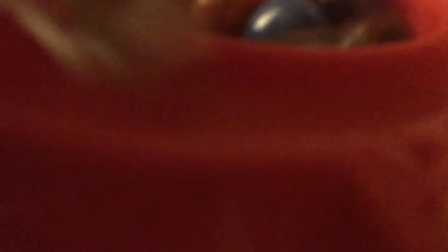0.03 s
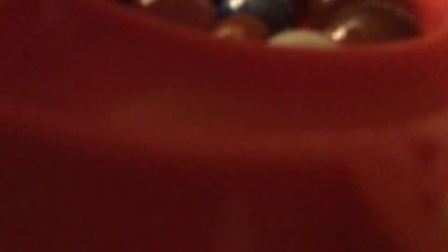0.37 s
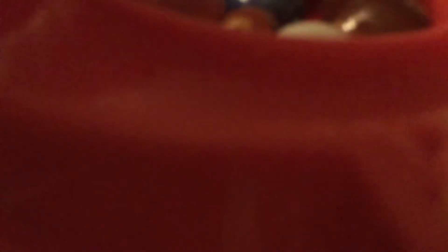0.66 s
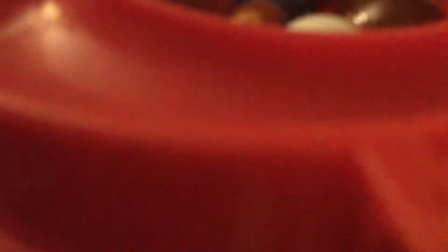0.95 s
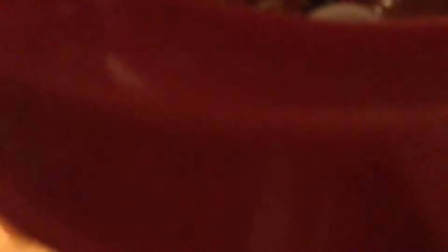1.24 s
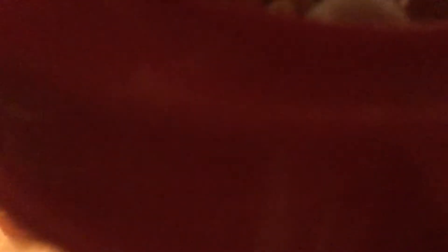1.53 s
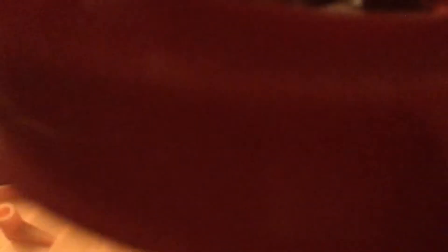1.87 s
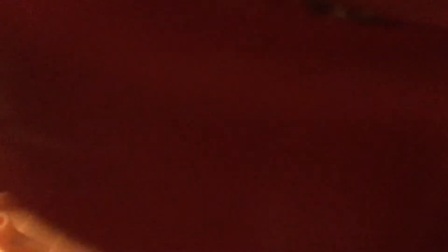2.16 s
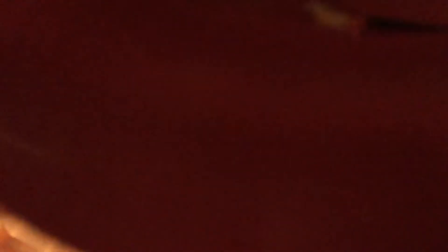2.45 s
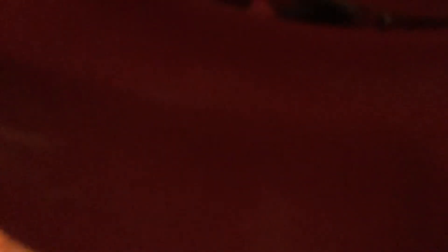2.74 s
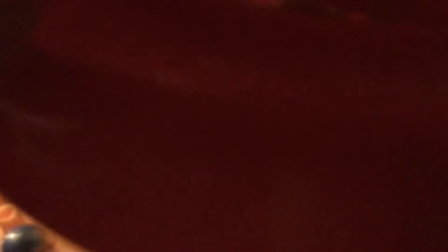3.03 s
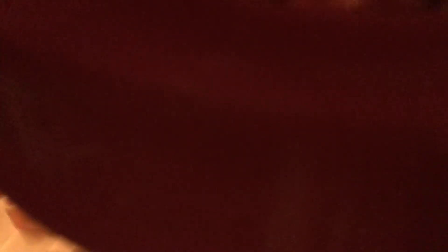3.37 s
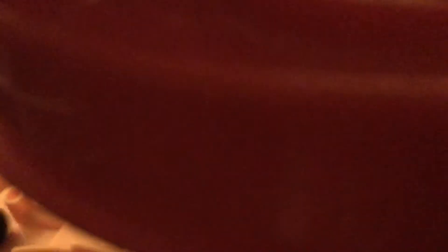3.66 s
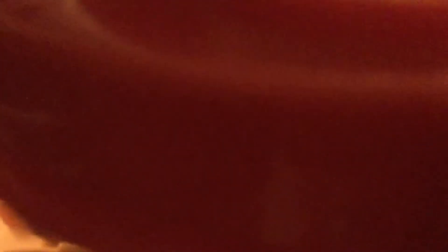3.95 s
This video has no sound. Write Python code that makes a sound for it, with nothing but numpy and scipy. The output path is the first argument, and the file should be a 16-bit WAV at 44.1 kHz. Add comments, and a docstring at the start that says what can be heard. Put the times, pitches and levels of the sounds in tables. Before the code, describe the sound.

Glass marbles stirred in a plastic bowl, sparse clicks building to a busy clatter.

```python
"""In a small room, close by, glass marbles are stirred in a plastic bowl: clacks thicken into a rattle.
Each impact excites three parts in its own shares: the bowl rings, its wall cracks, glass ticks on glass.
Rolling marbles keep the bowl ringing, lone ones clink, and square hits sound one hollow note.
Heavy blows send bending waves through the surface beneath, heard as thuds falling in pitch,
and stick-slip friction draws a few small squeaks from the plastic."""
import sys
import numpy as np
from scipy import signal
from scipy.fft import rfft, irfft
from scipy.io import wavfile
from scipy.ndimage import uniform_filter1d

SR = 44100
rng = np.random.default_rng(int(sys.argv[2]) if len(sys.argv) > 2 else 0)


def waveform_to_disk(signal):
    """Save audio, clipped to [-1, 1], as 16-bit WAV at the path in sys.argv[1]."""
    frames = np.transpose(np.atleast_2d(signal))
    scaled = np.clip(frames, -1, 1) * 32767
    samples = np.round(scaled).astype(np.int16)
    wavfile.write(sys.argv[1], SR, samples)


N = 176400


def amp(db):
    """The decibel scale: 20 dB is a tenfold amplitude."""
    return 10 ** (np.asarray(db) / 20)


def curve_at(points, hz):
    """Interpolation of a table on a logarithmic frequency axis."""
    frequency, value = np.transpose(points)
    return np.interp(np.log(hz + 1), np.log(frequency + 1), value)


def add(mix, start_s, sound):
    """Superposition: a sound adds to the mix from start_s on."""
    span = mix[max(round(start_s * SR), 0):][:len(sound)]
    span += sound[:len(span)]


def minimum_phase(colour, size=2048):
    """Minimum phase: the most compact causal impulse response with a given colour."""
    log_gain = np.log(amp(curve_at(colour, abs(np.fft.fftfreq(size, 1 / SR)))))
    return np.fft.ifft(np.exp(np.conj(signal.hilbert(log_gain)))).real[:size // 2]


def unit_attack(x):
    """Normalisation: each row gets unit RMS over its first 5 ms."""
    return x / np.sqrt(np.mean(x[:, :220] ** 2, axis=1, keepdims=True) + 1e-20)


# spectrum of the room's background noise: frequency_hz, density_db
ROOM_TONE_SPECTRUM = [(20, -15), (60, -8.5), (140, 5.5), (260, -8), (750, -2), (1400, -17), (4000, -19.5),
                      (9000, -41), (15000, -59)]

def room_tone(level_db=-47):
    """Stationary noise: the faint, steady background of the room."""
    gain = amp(curve_at(ROOM_TONE_SPECTRUM, np.fft.rfftfreq(N, 1 / SR)))
    air = irfft(rfft(rng.standard_normal(N)) * gain, N)
    return amp(level_db) * air / air.std()


# modes of the bowl, its wall and the glass: pitch_hz, level_db, t60_s
BOWL_MODES = [(800, -17.5, 0.05), (1113, -6, 0.069), (1311, -0.5, 0.034), (1437, 0.5, 0.059),
              (1648, -5.5, 0.042), (1900, -1.5, 0.0094), (2340, 4, 0.013)]
WALL_MODES = [(2554, -2.5, 0.094), (3235, -3, 0.083), (3645, -5, 0.048), (3960, 7, 0.019),
              (4595, 3.5, 0.038), (5360, 5, 0.035)]
GLASS_MODES = [(6910, 14.5, 0.014), (7630, 9.5, 0.0068), (8410, 6, 0.018), (8700, -20, 0.014),
               (9400, -14, .03), (10500, -7, 0.028)]
# spectrum of the contact crack in each part: frequency_hz, gain_db
BOWL_COLOUR = [(40, -22), (200, -10), (650, -17), (1000, -8), (1450, 1.5), (2300, -1.5), (3300, -20.5),
               (8000, -58)]
WALL_COLOUR = [(700, -61), (1800, -27.5), (2600, 1), (4800, -3.5), (6000, -8), (8000, -17), (16000, -55)]
GLASS_COLOUR = [(1500, -28), (4500, -13), (6300, 1.5), (8000, -4), (9300, 4.5), (10500, -11), (12500, -15),
                (14000, -23), (15500, -47)]
# one row each for bowl, wall and glass: level_db, ring_over_crack_db, crack_rise_s, crack_decay_s
IMPACT_PARTS = [(-3, -3.5, 0.00026, 0.0028), (-2.5, -5, 0.00047, 0.0014), (-3, -3, 0.00015, 0.0011)]

def impacts(part, count, size=2600, pitch_spread=0.031, size_spread=0.06):
    """Impact excitation of one part: a crack, and damped modes weighted by the random spot struck."""
    modes = (BOWL_MODES, WALL_MODES, GLASS_MODES)[part]
    colour = (BOWL_COLOUR, WALL_COLOUR, GLASS_COLOUR)[part]
    level_db, ring_db, rise_s, decay_s = IMPACT_PARTS[part]
    t = np.arange(size) / SR
    contact = rng.standard_normal((count, size)) * (1 - np.exp(-t / rise_s)) * np.exp(-t / decay_s)
    shifts = np.exp(size_spread * np.linspace(-2, 2, 9))  # marble size shifts the crack's colour
    filters = np.array([minimum_phase([(hz * shift, db) for hz, db in colour]) for shift in shifts])
    picks = rng.binomial(len(shifts) - 1, .5, count)
    crack = signal.fftconvolve(contact, filters[picks], axes=1)[:, :size]
    ring = 0
    for hz, db, t60 in modes:
        weight, detune = rng.standard_normal((2, count, 1))
        tone = np.sin(2 * np.pi * hz * (1 + pitch_spread * detune) * t)
        ring = ring + weight * abs(weight) * amp(db - 60 * t / t60) * tone
    return amp(level_db) * unit_attack(unit_attack(crack) + amp(ring_db) * unit_attack(ring))


# how hard the heap is jostled: time_s, level_db
HEAP_ACTIVITY = [(0, -29), (.2, -35.5), (.27, -40.5), (.36, -36), (.47, -41), (.6, -38), (.77, -53.5),
                 (.87, -38), (1.01, -45.5), (1.14, -38.5), (1.33, -35), (1.5, -40), (1.58, -46),
                 (1.68, -42), (1.79, -25), (1.96, -53), (2.08, -18), (2.18, -28), (2.42, -40.5),
                 (2.52, -30.5), (2.86, -25), (3.25, -24.5), (3.44, -28), (3.62, -21), (3.76, -16.5),
                 (3.86, -26), (4, -25.5)]

def chance_contacts(per_s=400, spread_db=5.5):
    """A Poisson process: sample positions and levels of light contacts in the shifting heap."""
    at = np.flatnonzero(rng.random(N) < per_s / SR)
    scatter_db = spread_db * np.clip(rng.standard_normal(N)[at], -2, 2)
    return at, np.interp(at / SR, *np.transpose(HEAP_ACTIVITY)) + scatter_db


def jostling(part, light, at, force_db, part_db=(-9.5, -11.5, -18.5), spread_db=3):
    """Energy sharing: each chance contact excites this part by a share of its own."""
    out = np.zeros(N)
    picks = rng.integers(0, len(light), N)
    share_db = part_db[part] + spread_db * np.clip(rng.standard_normal(N), -2, 2)
    for i, db in zip(at, force_db):
        add(out, i / SR, amp(db + share_db[i]) * light[picks[i]])
    return out


# distinct marble knocks: start_s, bowl_db, wall_db, glass_db
MARBLE_KNOCKS = [(0.0074, -19.5, -21.5, -26.5), (0.0516, -13.5, -12.5, -17), (0.0847, -27, -26, -30),
                 (0.1094, -22.5, -21.5, -22), (0.1235, -27, -23, -21), (0.158, -36, -21, -17),
                 (0.1634, -23.5, -25, -20), (0.1823, -27, -25, -18), (0.1882, -30, -22, -17),
                 (0.2259, -24.5, -26, -25), (0.291, -27, -18, -14.5), (0.2968, -17.5, -11, -12),
                 (0.3156, -29, -21, -32), (0.3467, -33, -26.5, -38), (0.3975, -38, -39, -47),
                 (0.412, -23, -24.5, -29), (0.4155, -27.5, -21.5, -33.5), (0.5065, -24, -18, -28.0),
                 (0.5492, -19.5, -20, -9), (0.556, -41, -19, -21), (0.5615, -26, -29, -35),
                 (0.572, -27, -23, -34.0), (0.5832, -44, -31, -21.5), (0.6189, -30, -21.5, -47),
                 (0.66, -34, -37, -39), (0.6982, -30.5, -31.5, -42.5), (0.8186, -26.5, -22, -24),
                 (0.8401, -20.5, -21, -36), (0.9443, -24, -20.5, -28.5), (1.052, -25, -22.5, -34),
                 (1.0823, -29, -26.5, -36), (1.148, -34, -22.5, -32.0), (1.1662, -22, -22, -32),
                 (1.2067, -27.5, -15.5, -36), (1.2261, -36, -18, -28), (1.2516, -40, -29, -32),
                 (1.2757, -43, -21.5, -35), (1.3075, -36, -19.5, -22.5), (1.3164, -24, -19, -23),
                 (1.3306, -38, -22, -28), (1.4182, -20.5, -30.5, -27), (1.4669, -26, -35, -41),
                 (1.4983, -30.5, -30.5, -32), (1.5455, -31, -27, -31), (1.563, -19, -15, -16),
                 (1.581, -13.5, -16, -14.5), (1.6052, -17, -28, -26.5), (1.6712, -25.5, -33.5, -44),
                 (1.7204, -36, -27.5, -29.5), (1.7553, -27, -27, -18), (1.7758, -25, -17, -13.5),
                 (1.7815, -25, -33, -18.5), (1.8074, -17.5, -22, -14.5), (1.8667, -16.5, -20.5, -23),
                 (1.8766, -43, -36, -28), (1.8995, -21.5, -24.5, -21), (1.918, -30, -26, -20.5),
                 (2.013, -21, -18.0, -19), (2.018, -12.5, -25, -11), (2.0375, -16.5, -22, -16.5),
                 (2.06, -10.5, -23, -32), (2.0735, -15, -31, -16.5), (2.0863, -16, -17, -15.5),
                 (2.1059, -23, -23, -27), (2.116, -14, -33, -14.5), (2.129, -41, -22, -22),
                 (2.1407, -17, -15.5, -19), (2.145, -16, -19, -13), (2.2071, -17.5, -23, -15),
                 (2.2203, -13, -39, -43), (2.226, -12, -10, -13.5), (2.2435, -13.5, -18.5, -19),
                 (2.288, -23, -25, -24), (2.294, -12, -16, -21), (2.324, -15.5, -16, -21),
                 (2.3408, -12.5, -15, -22), (2.382, -22, -19.5, -24), (2.412, -21.5, -30, -28),
                 (2.436, -22, -24, -56), (2.458, -11, -10.5, -21), (2.4765, -8.5, -8, -12),
                 (2.495, -8.5, -11, -19), (2.5125, -8.5, -25, -13.5), (2.5394, -15, -19, -23),
                 (2.5522, -7, -9.5, -11.5), (2.5787, -10.5, -17, -9), (2.5973, -13.5, -21, -13),
                 (2.6206, -13.5, -18, -19), (2.6276, -11.5, -16, -29), (2.635, -14.5, -37, -15.5),
                 (2.6768, -15.5, -26, -20.5), (2.691, -15.5, -21, -25), (2.697, -15, -18, -19),
                 (2.7537, -15.5, -15.5, -12), (2.7805, -15.5, -25, -31.0), (2.8029, -11.5, -17.5, -10),
                 (2.8212, -24, -29, -25), (2.838, -23, -17.5, -21), (2.8507, -6.5, -14, -19),
                 (2.867, -12.5, -16, -21), (2.922, -22.0, -18, -20), (2.9419, -10.5, -12, -11.5),
                 (2.962, -8, -10, -35), (2.9669, -14, -14, -7.5), (2.9796, -9, -10, -16),
                 (2.9914, -20, -25, -33), (3.004, -12.5, -29, -21), (3.0183, -14, -30, -16.5),
                 (3.0582, -11, -32, -23), (3.078, -16.5, -22, -19.5), (3.1297, -7.5, -21, -7),
                 (3.1603, -19, -23, -21), (3.205, -7.5, -5.5, -17), (3.2206, -7, -10, -8),
                 (3.224, -4.5, -16, -5), (3.2635, -15.5, -19, -35), (3.2905, -10.5, -14.5, -12.5),
                 (3.3182, -26, -41, -40), (3.3393, -12, -20, -17), (3.3616, -17, -24, -22),
                 (3.402, -17, -21, -30), (3.4209, -14.5, -19.5, -33), (3.4574, -28, -15.5, -41),
                 (3.4662, -12, -17, -39), (3.492, -8, -12.5, -10), (3.552, -14.5, -14.5, -19),
                 (3.5605, -10, -16.5, -8.5), (3.6073, -19, -24, -21), (3.656, -39, -32, -41),
                 (3.6904, -14.5, -22, -29), (3.696, -23, -20, -18), (3.7072, -16, -18.5, -27),
                 (3.7458, -31, -20, -10), (3.7578, -18, -23, -35), (3.77, -19, -23, -27),
                 (3.779, -28, -21, -18), (3.788, -11.5, -15.5, -17), (3.7913, -24, -24, -10),
                 (3.8523, -36, -39, -19.5), (3.8591, -16.5, -17, -12.5), (3.8983, -18, -22.5, -28),
                 (3.9251, -15.5, -19, -31), (3.9879, -14.5, -18.5, -22)]

def knocks(part, light, delays_s, echoes_db, spread_db=3):
    """Collision: each knock excites this part, along with its lighter touch and rebounds."""
    out = np.zeros(N)
    hits = impacts(part, len(MARBLE_KNOCKS))
    for (start_s, *part_db), hit, delays, levels in zip(MARBLE_KNOCKS, hits, delays_s, echoes_db):
        add(out, start_s, amp(part_db[part]) * hit)
        for delay_s, db in zip(delays, levels):
            level_db = part_db[part] + db + spread_db * rng.standard_normal()
            add(out, start_s + delay_s, amp(level_db) * rng.choice(light))
    return out


def touch_and_rebounds(lead_s=0.0035, gap_s=0.0054, levels_db=(-14.5, -11, -17, -23), loss_per_db=0.12):
    """Momentum transfer: delays and levels of a touch before each knock and three rebounds after it."""
    stretch = .5 + rng.random((len(MARBLE_KNOCKS), len(levels_db)))
    touch_s = -lead_s * stretch[:, :1]
    rebounds_s = np.cumsum(gap_s * stretch[:, 1:], axis=1)
    activity_db = np.interp(np.array(MARBLE_KNOCKS)[:, :1], *np.transpose(HEAP_ACTIVITY))
    calm_db = activity_db.max() - activity_db  # a calm heap passes on less
    return np.hstack([touch_s, rebounds_s]), np.array(levels_db) - loss_per_db * calm_db


# thuds and soft bumps in the surface beneath: start_s, level_db, first_pitch_hz, halving_s, decay_s
SURFACE_THUDS = [(0.052, -16, 440, 0.013, 0.0027), (0.5499, -2, 443, 0.0017, 0.0091),
                 (0.879, -27, 232, 0.073, .009), (1.0449, -25, 596, 0.0015, 0.0056),
                 (1.167, -19.5, 425, 0.0022, .0087), (1.3182, -22, 450, 0.003, 0.0078),
                 (1.3777, -20, 175, .047, 0.0079), (1.4733, -21.5, 325, 0.0025, 0.0098),
                 (1.6318, -22.5, 327, 0.0073, .009), (1.7213, -20, 296, 0.0044, 0.0098),
                 (1.8212, -18, 490, 0.0028, 0.0072), (1.9796, -17, 550, 0.0018, 0.0074),
                 (2.0857, -17.5, 425, 0.0027, 0.011), (2.1189, -15.5, 425, 0.003, 0.0066),
                 (2.1407, -22, 308, 0.053, 0.013), (2.4776, -20, 432, .014, 0.015),
                 (2.5523, -20, 420, 0.031, 0.017), (2.8058, -17, 494, 0.0016, 0.0034),
                 (2.8726, -18.5, 275, .018, .004), (2.9694, -9, 470, 0.0011, 0.0081),
                 (3.1306, -11.5, 475, .0021, 0.014), (3.2057, -1, 590, 0.0012, 0.0079),
                 (3.2273, -4.5, 149, 0.0084, 0.017), (3.2916, -8.5, 323, 0.0031, .0106),
                 (3.339, -20, 550, 0.0017, .0106), (3.493, 0, 427, .0021, .0087),
                 (3.561, -2.5, 422, 0.0026, 0.011), (3.7463, -8.5, 483, .0016, 0.0083),
                 (3.7914, -4, 378, 0.0021, 0.011)]

def thuds(rise_s=0.00022, gain_db=0.5, rough_db=-11, rough_hz=850, rough_s=0.0043):
    """Dispersion: a rough knock starts a bending wave whose highs arrive first, so its pitch falls."""
    out, t = np.zeros(N), np.arange(SR // 10) / SR
    lowpass = signal.butter(4, rough_hz / (SR / 2), output="sos")
    grit = signal.sosfilt(lowpass, rng.standard_normal((len(SURFACE_THUDS), len(t))))
    for (start_s, db, first_hz, halving_s, decay_s), noise in zip(SURFACE_THUDS, grit / grit.std()):
        hz = first_hz / (1 + t / halving_s)
        wave = -np.exp(-(t / decay_s) ** 0.97) * np.sin(2 * np.pi * np.cumsum(hz) / SR)
        knock = amp(rough_db) * noise * np.exp(-t / rough_s)
        add(out, start_s, amp(db + gain_db) * (1 - np.exp(-t / rise_s)) * (wave + knock))
    return out


# marbles rolling or skidding along the wall: start_s, length_s, bowl_db, wall_db, glass_db
MARBLE_ROLLS = [(0.171, 0.03, -31.5, -33.5, -25.5), (1.303, 0.11, -38, -35, -43),
                (1.7581, 0.0081, -15, -10.5, -13), (1.938, 0.006, -16, -14.5, -13),
                (1.977, 0.013, -19.5, -19, -15.5), (1.9974, 0.011, -13.5, -11.5, -16.5),
                (2.485, 0.056, -21.5, -31, -34), (2.57, 0.051, -23, -31, -47),
                (2.618, 0.055, -25, -36, -36), (2.825, .06, -21.5, -26, -30), (2.998, 0.063, -28, -37, -38),
                (3.538, 0.19, -35.5, -34, -41.5), (3.789, 0.093, -35, -50, -61)]

def rolling(part, light, per_s=600, max_contacts=200):
    """Rolling contact: a quick, uneven run of small impacts on the wall swells and dies away."""
    out = np.zeros(N)
    for start_s, length_s, *part_db in MARBLE_ROLLS:
        jitter, picks = rng.random((2, max_contacts))
        times = (np.arange(max_contacts) + jitter) / per_s
        for t, pick in zip(times[times < length_s], picks):
            swell = np.sin(np.pi * t / length_s)
            add(out, start_s + t, amp(part_db[part]) * swell * light[int(pick * len(light))])
    return out


# clinks of single marbles: start_s, level_db
LONE_CLINKS = [(0.4145, -19.5), (0.507, -17), (0.819, -18.5), (0.946, -26)]
# modes of a clink: pitch_hz, level_db, t60_s
CLINK_MODES = [(3200, -12, .045), (3510, -4.5, .05), (4630, 2.5, .042)]

def clinks():
    """Free vibration: a marble that lands on its own leaves a clear, high ring."""
    out, t = np.zeros(N), np.arange(SR // 10) / SR
    for start_s, level_db in LONE_CLINKS:
        for hz, db, t60 in CLINK_MODES:
            envelope = rng.uniform(0.58, 1) * amp(level_db + db - 60 * t / t60)
            add(out, start_s, envelope * np.sin(2 * np.pi * hz * t))
    return out


# squeaks of the plastic: start_s, length_s, first_pitch_hz, last_pitch_hz, level_db
PLASTIC_SQUEAKS = [(1.166, 0.052, 500, 617, -19), (1.201, 0.086, 1350, 1293, -28),
                   (1.329, 0.048, 538, 610, -27)]

def squeaks(ramp_s=0.0038, fade_db=-18, octave_db=-18, roughness=0.22):
    """Stick-slip friction: rubbed plastic gives a short, uneven note that glides and fades."""
    out = np.zeros(N)
    flutter = uniform_filter1d(rng.standard_normal(N), size=200)
    for start_s, length_s, first_hz, last_hz, db in PLASTIC_SQUEAKS:
        t = np.arange(0, length_s, 1 / SR)
        phase = 2 * np.pi * np.cumsum(first_hz + (last_hz - first_hz) * t / length_s) / SR
        ramps = np.minimum(np.minimum(t, length_s - t) / ramp_s, 1)
        tone = np.sin(phase) + amp(octave_db) * np.sin(2 * phase)
        add(out, start_s, ramps * amp(db + fade_db * t / length_s) * tone)
    return out * (1 + roughness * flutter / flutter.std())


# square hits on the bowl: start_s, level_db, pitch_hz
HOLLOW_KNOCKS = [(1.6063, -16, 1350), (2.645, -2, 1510), (2.677, -6, 1205), (2.753, -2, 1413),
                 (2.781, -8.5, 1740)]

def hollow_knocks(rise_s=0.00044, t60_s=0.027):
    """Resonance: a marble that hits the bowl squarely sounds one note, set by the spot it lands on."""
    out, t = np.zeros(N), np.arange(SR // 10) / SR
    for start_s, level_db, hz in HOLLOW_KNOCKS:
        envelope = (1 - np.exp(-t / rise_s)) * amp(level_db - 60 * t / t60_s)
        add(out, start_s, envelope * np.sin(2 * np.pi * hz * t))
    return out


# reverberation time of the room: frequency_hz, t60_s
REVERB_TIMES = [(100, 0.1), (500, 0.088), (1400, 0.15), (3500, 0.15), (9000, 0.15), (15000, 0.1)]
# spectrum at the start of the tail: frequency_hz, gain_db
REVERB_COLOUR = [(100, 14.5), (1400, 3.5), (4500, -5.5), (7000, -1), (9500, -22), (14000, 6)]

def reverberation(x, build_s=0.0012):
    """A diffuse field: reflections build into a short tail, each band dying at its own rate."""
    hz, frame_s, bands = signal.stft(rng.standard_normal(SR // 2), SR, nperseg=256)
    decay_db = 60 * frame_s / curve_at(REVERB_TIMES, hz)[:, None]
    tail = signal.istft(bands * amp(curve_at(REVERB_COLOUR, hz)[:, None] - decay_db), SR)[1]
    t = np.arange(len(tail)) / SR
    tail *= 1 - np.exp(-(t / build_s) ** 2)
    return signal.fftconvolve(x, tail / np.linalg.norm(tail))[:N]


def scene(reverb_db=-10, thud_send_db=-21):
    """Superposition of direct sound, reverberation and room tone; thuds excite the room only weakly."""
    contacts, rebounds = chance_contacts(), touch_and_rebounds()
    marbles = np.zeros(N)
    for part in range(3):  # bowl, wall, glass
        light = impacts(part, count=48)  # a stock of sounds for the light contacts
        marbles += knocks(part, light, *rebounds) + rolling(part, light) + jostling(part, light, *contacts)
    airborne = marbles + clinks() + squeaks() + hollow_knocks()
    surface = thuds()
    reflected = amp(reverb_db) * reverberation(airborne + amp(thud_send_db) * surface)
    return (airborne + surface + reflected + room_tone())[None]


# frequency response of the microphone: frequency_hz, gain_db
MIC_RESPONSE = [(20, -12), (45, -3), (150, 0), (400, 1), (800, 0.5), (1400, 0), (2500, -1.5), (4500, -1),
                (6500, -6.5), (9200, 1.5), (12500, 2), (16000, -9)]

def record(dry, ceiling=1.05, cutoff_hz=16200):
    """Transduction: microphone colour, soft saturation on the hardest knocks, then a band limit."""
    coloured = signal.fftconvolve(dry, minimum_phase(MIC_RESPONSE, size=8192)[None], axes=1)[:, :N]
    saturated = coloured / (1 + (coloured / ceiling) ** 6) ** (1 / 6)
    lowpass = signal.firwin(255, cutoff_hz, window=("kaiser", 9), fs=SR)
    return signal.oaconvolve(saturated, lowpass[None], "same")


dry = scene()
out = record(dry)
waveform_to_disk(out)
```